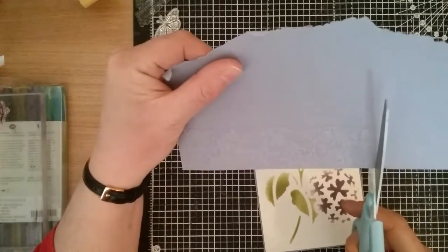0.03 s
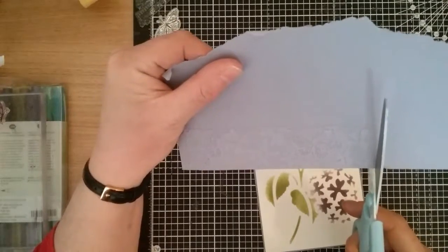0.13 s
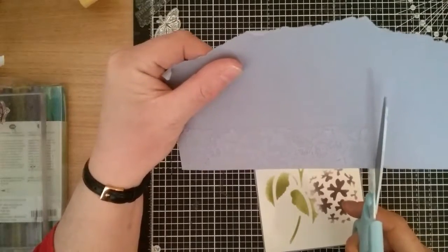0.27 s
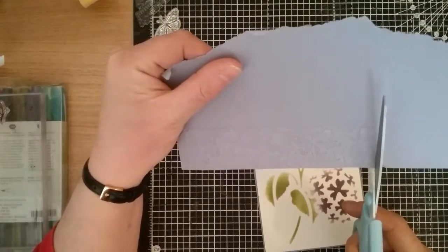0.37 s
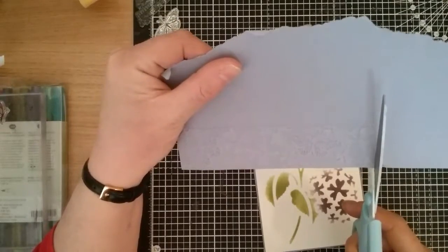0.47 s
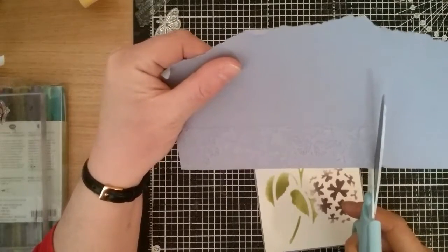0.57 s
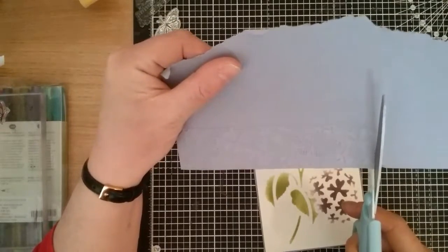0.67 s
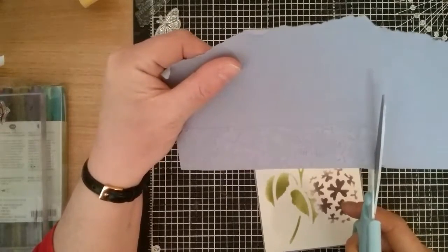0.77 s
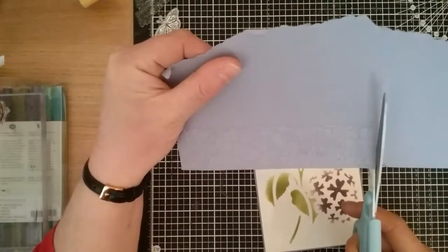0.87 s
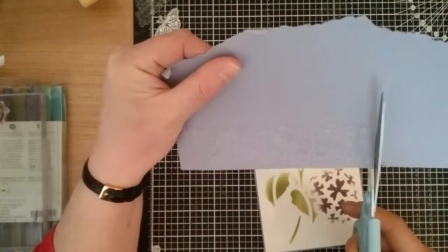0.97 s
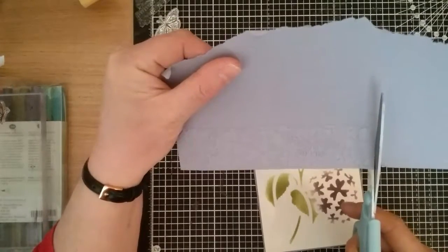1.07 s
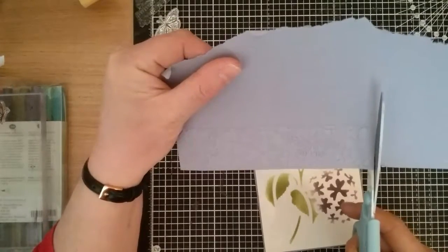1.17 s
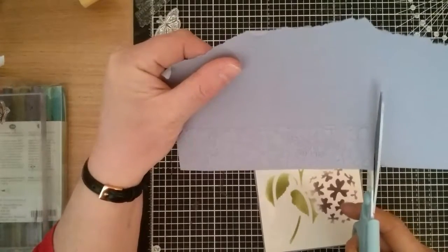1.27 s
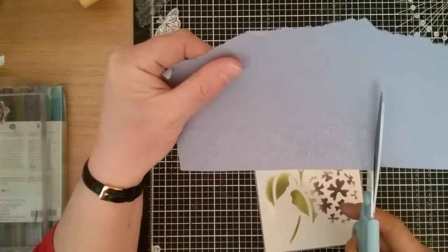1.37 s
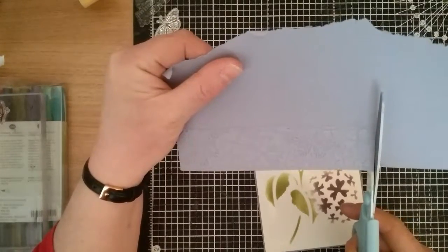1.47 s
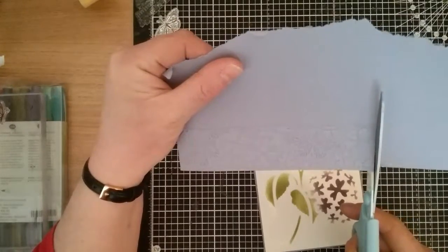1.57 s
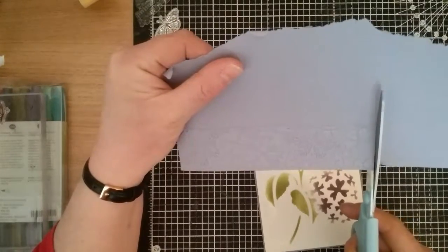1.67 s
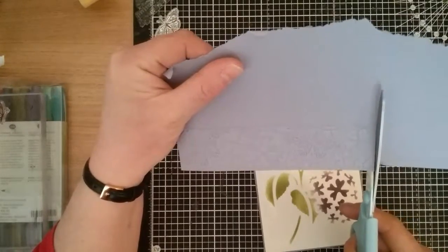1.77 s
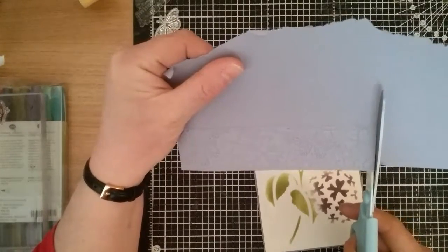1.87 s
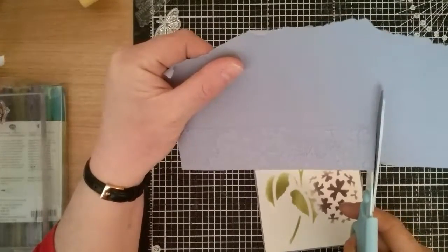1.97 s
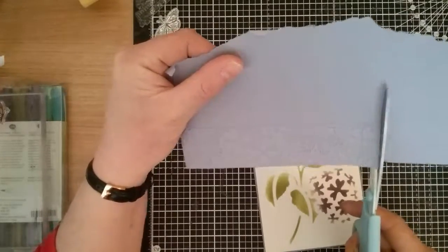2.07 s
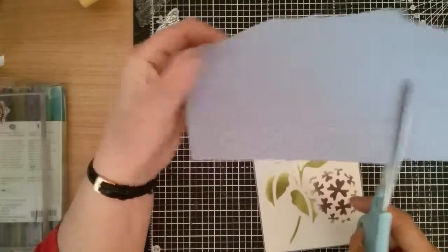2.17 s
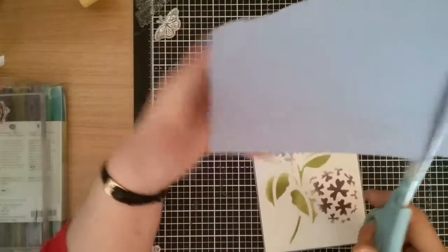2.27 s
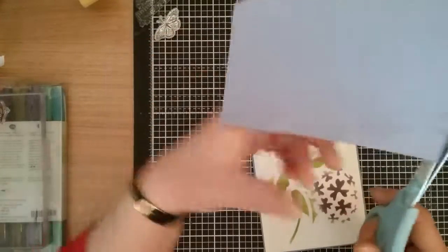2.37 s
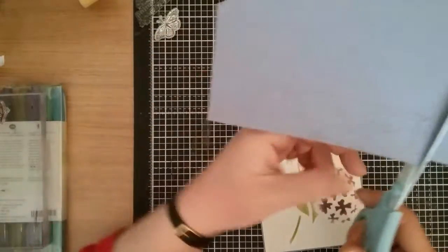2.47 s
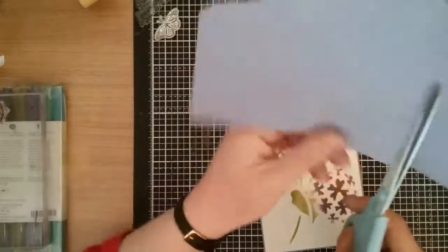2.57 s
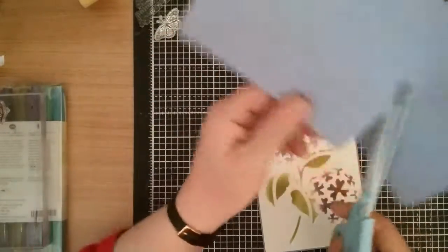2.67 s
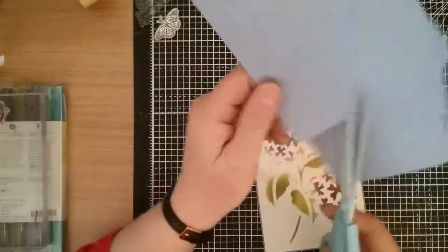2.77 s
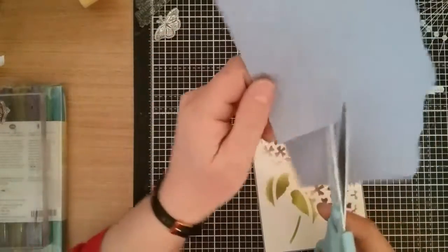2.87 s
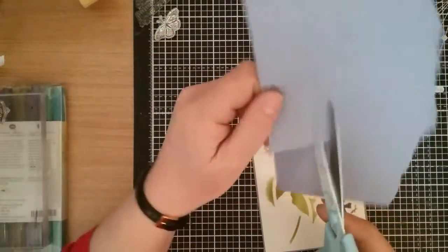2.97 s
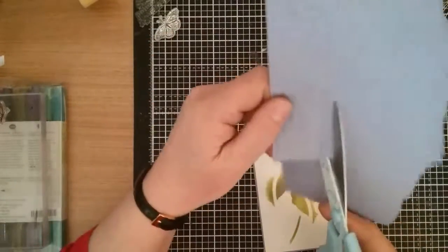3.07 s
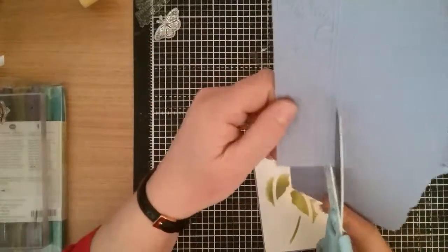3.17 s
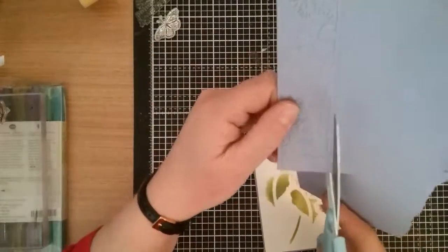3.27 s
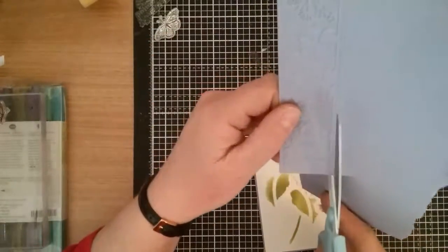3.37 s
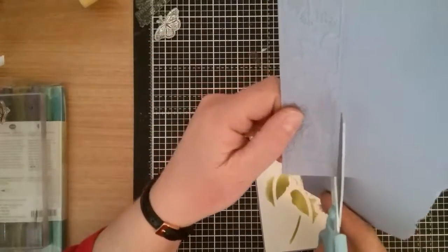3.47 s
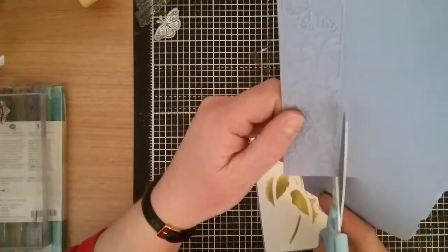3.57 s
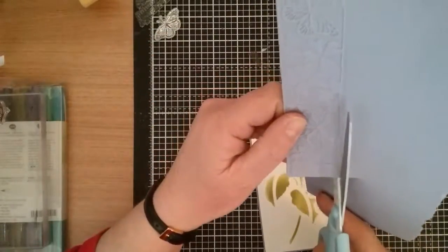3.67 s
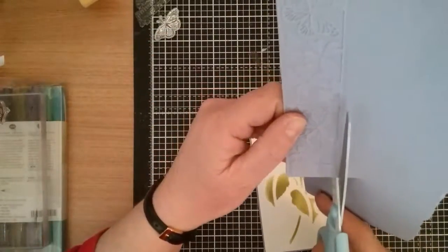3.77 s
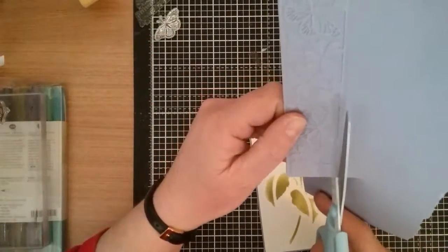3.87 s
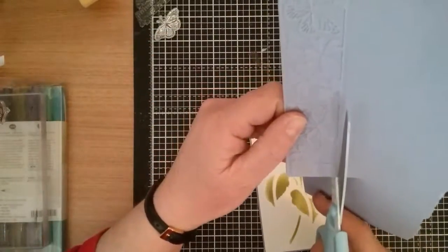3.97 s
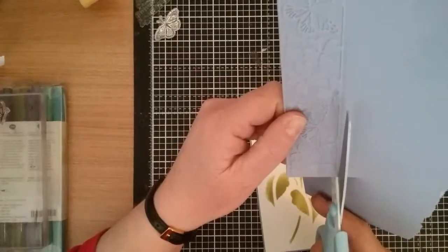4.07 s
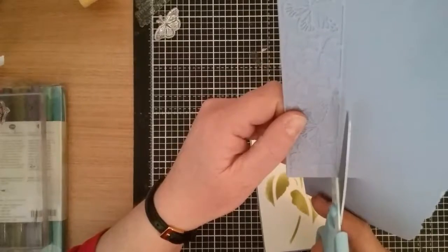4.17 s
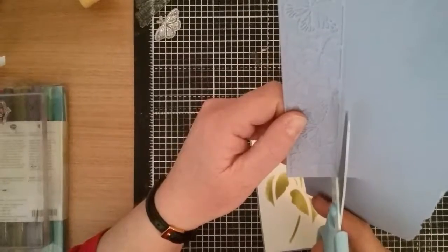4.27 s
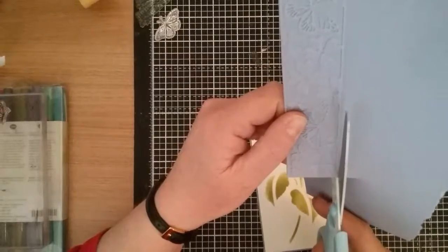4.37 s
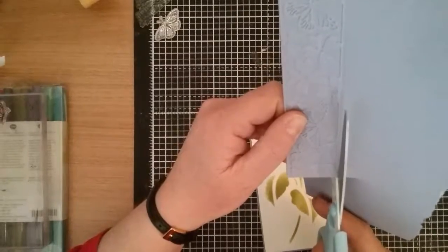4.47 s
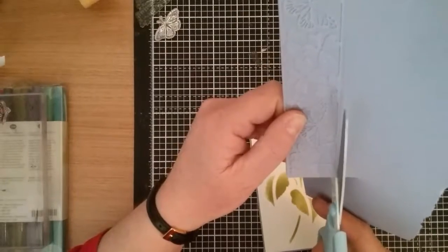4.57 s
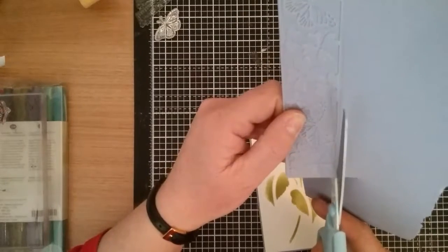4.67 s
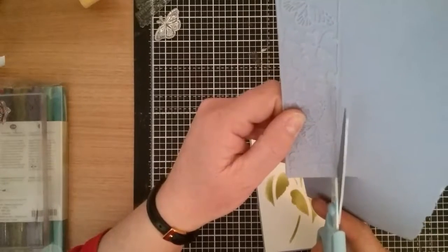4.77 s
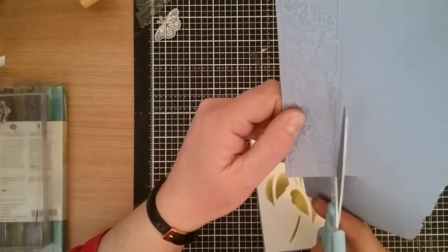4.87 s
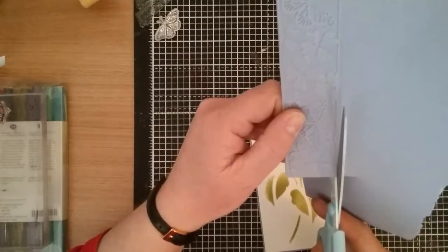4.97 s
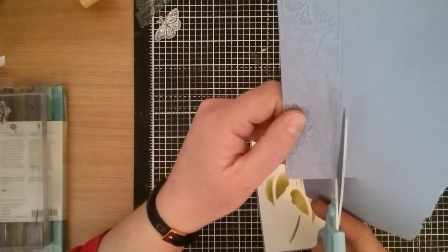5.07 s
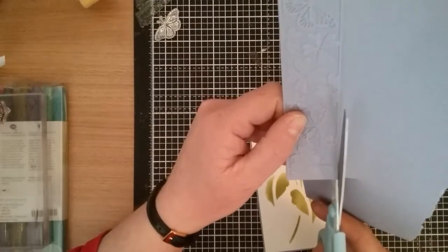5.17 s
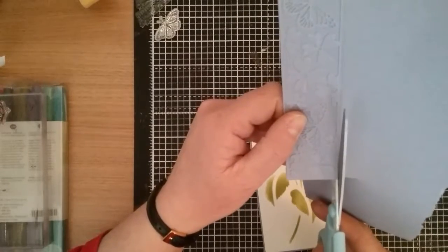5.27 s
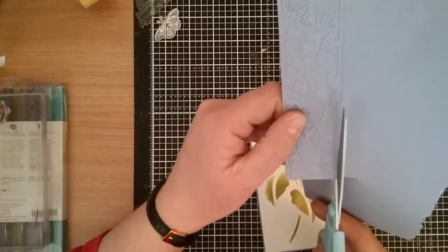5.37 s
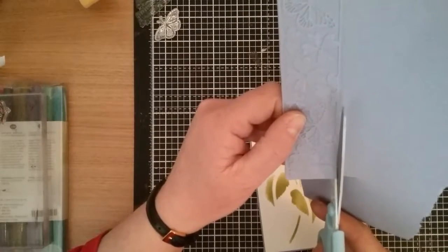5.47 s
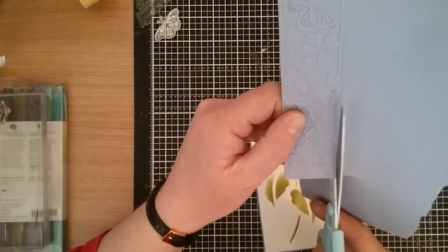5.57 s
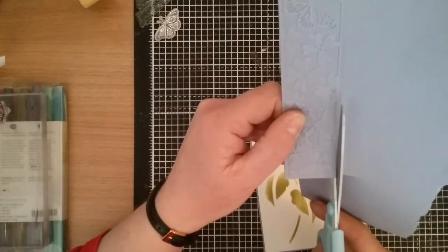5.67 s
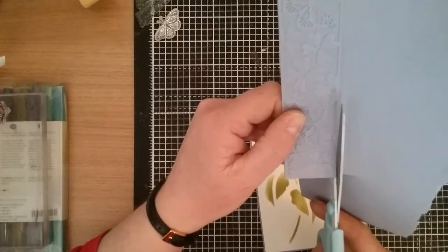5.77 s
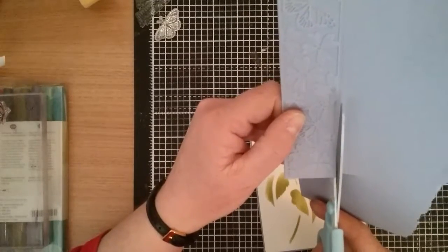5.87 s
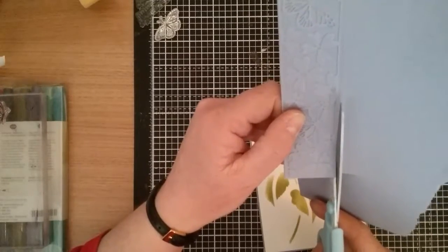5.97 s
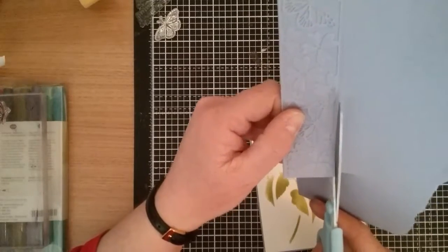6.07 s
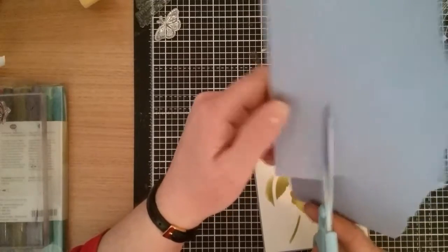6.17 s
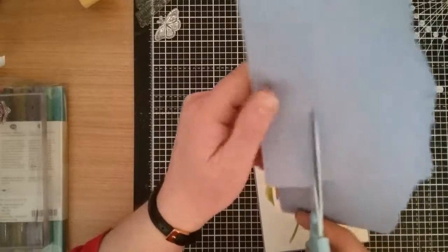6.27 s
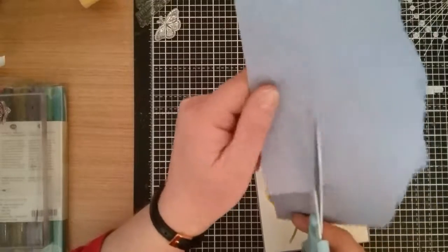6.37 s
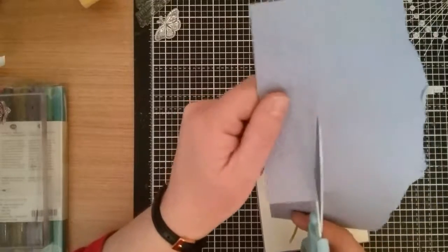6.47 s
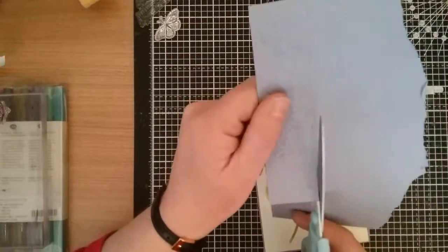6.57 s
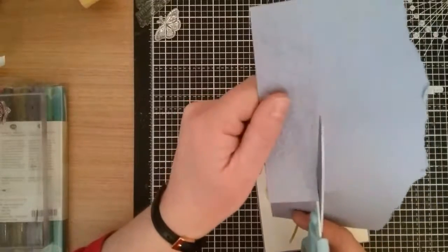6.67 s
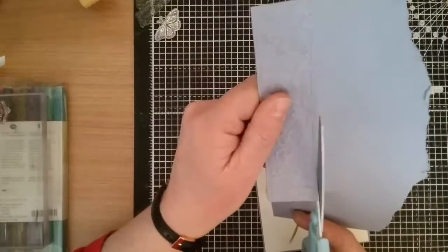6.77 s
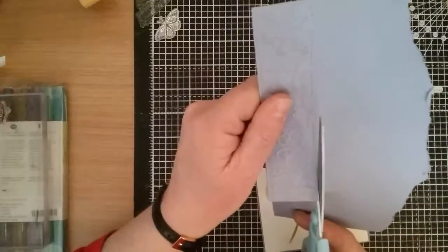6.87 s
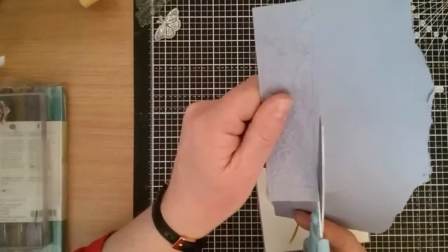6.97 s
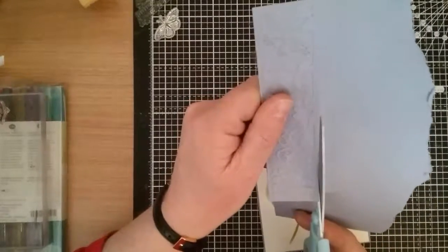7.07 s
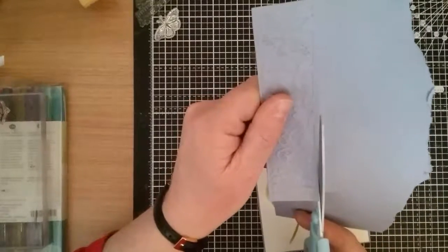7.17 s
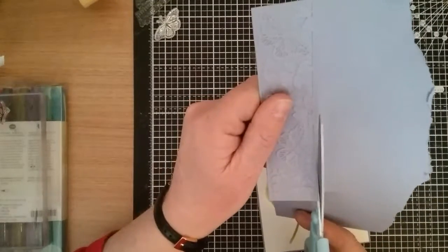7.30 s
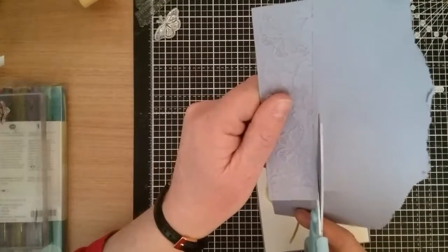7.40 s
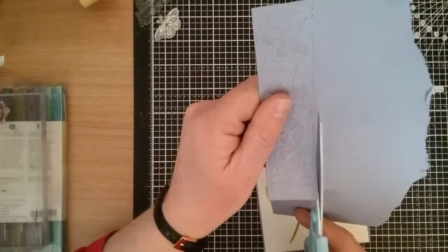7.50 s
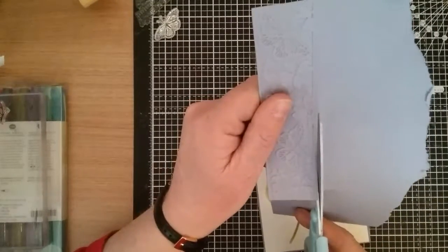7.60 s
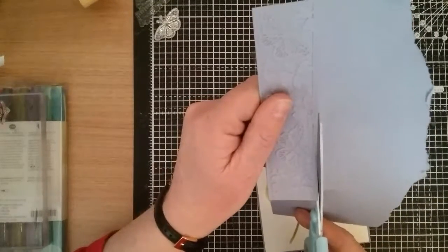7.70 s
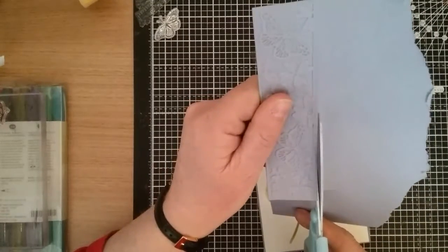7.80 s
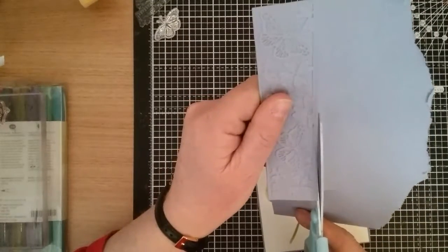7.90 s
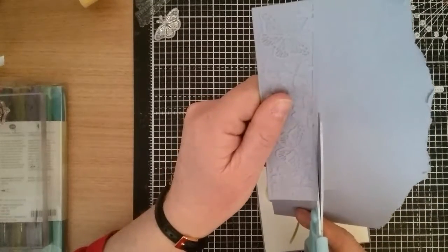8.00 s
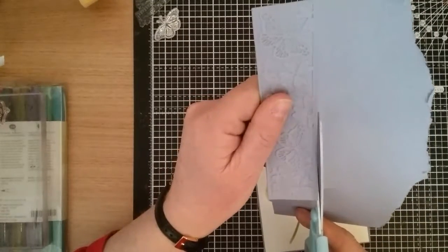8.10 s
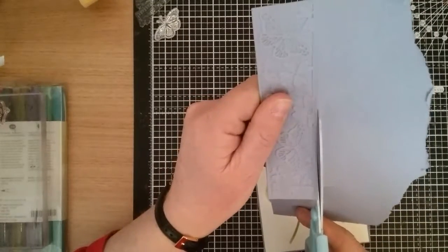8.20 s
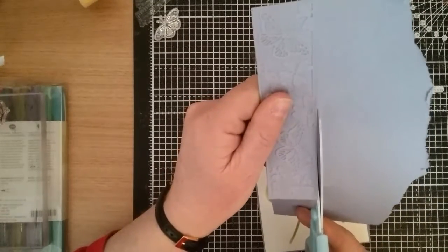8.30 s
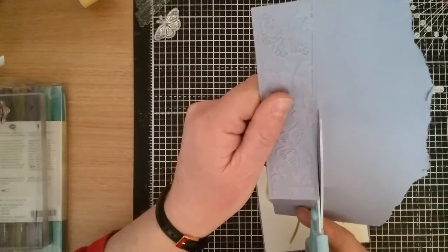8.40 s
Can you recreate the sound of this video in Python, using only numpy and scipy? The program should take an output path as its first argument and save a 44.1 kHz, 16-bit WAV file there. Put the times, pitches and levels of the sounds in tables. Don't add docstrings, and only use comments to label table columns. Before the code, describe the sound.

Scissors cut a stiff sheet of card close to a small microphone. Faint, thin nibbles grow into firmer crunches, then the sheet is turned with flaps, a sharp snap and papery rubbing. After a lull a second cut crackles along, another brief rustle follows, and a third cut begins. A quiet small room adds short reflections, a steady low hum and a faint high whine.

```python
import sys
import numpy as np
from scipy import signal
from scipy.fft import rfft, irfft
from scipy.io import wavfile
from scipy.ndimage import uniform_filter1d

SR = 44100
rng = np.random.default_rng(int(sys.argv[2]) if len(sys.argv) > 2 else 0)


def digitize_waveform(pressure):
    field = np.atleast_2d(pressure).T
    bounded = np.clip(field, -1, 1)
    quanta = np.round(bounded * 32767).astype(np.int16)
    wavfile.write(sys.argv[1], SR, quanta)


def decibels_to_gain(level_db):
    exponent = np.asarray(level_db, float) / 20
    return 10 ** exponent


N = 372204

HUM_HZ = 119.8
# t/s, peak level/dB
SNAP_EVENTS = [
    (2.219, -47),
    (2.5878, -31.5),
    (2.6235, -36),
    (6.228, -33.5),
    (6.236, -46),
    (6.355, -48),
]


def evened(x):
    return x / np.sqrt(np.mean(x ** 2) + 1e-20)


def read(points, hz):
    f, value = np.transpose(points)
    return np.interp(np.log(hz + 1), np.log(f + 1), value)


def add(mix, s, sound):
    part = mix[max(round(s * SR), 0):][:len(sound)]
    part += sound[:len(part)]


def drift(hz):
    return evened(signal.lfilter(*signal.butter(2, hz, fs=SR), rng.standard_normal(N)))


def fibres(count, per_s, spread_db):
    sizes = decibels_to_gain(spread_db * np.minimum(rng.exponential(1, count), 4))
    happens = rng.random(count) < per_s / SR
    return evened(sizes * rng.standard_normal(count) * happens)


def card(bend, tilt=((1, 0), (2, 0)), lift=1, wake_spread_db=5, size=2048):
    # low edge f/Hz, high edge f/Hz
    ranges = [
        (4600, 16000),
        (1100, 4600),
        (420, 1100),
        (150, 420),
    ]
    # f/Hz, width/Hz, level/dB
    sheet_modes = [(214, 115, 5.5), (308, 45, 8), (547, 100, 0), (627, 24, 14.5), (883, 27, 14),
                   (1373, 110, 7.5), (1735, 73, 17), (2324, 170, 10.5), (2870, 200, 7), (3580, 300, 7),
                   (4410, 290, 6.5), (5230, 210, -2), (6070, 200, 0), (6570, 250, -0.5)]
    # f/Hz, level/dB
    slope = [(150, 6), (400, 1.5), (1000, -5), (3000, -9), (4700, -13), (5900, -4.5), (6600, -11),
             (7400, -14.5), (9000, -21.5), (15000, -26)]
    hz = abs(np.fft.fftfreq(size, 1 / SR)) + 1
    shifts = 1 + bend * rng.standard_normal(len(sheet_modes))
    wakes_db = wake_spread_db * rng.standard_normal(len(sheet_modes))
    modes = 0
    for (f, width_hz, db), shift, wake_db in zip(sheet_modes, shifts, wakes_db):
        modes = modes + decibels_to_gain(db + wake_db) * width_hz / np.hypot(width_hz, 2 * (hz - f * shift))
    gain = decibels_to_gain(read(slope, hz / lift) + read(tilt, hz)) * (1 + modes)
    parts = np.array([gain / np.sqrt((1 + (lo / hz) ** 8) * (1 + (hz / hi) ** 8)) for lo, hi in ranges])
    spectrum = np.exp(np.conj(signal.hilbert(np.log(parts + 1e-4))))
    return np.fft.ifft(spectrum).real[:, :size // 2]


def snips():
    # t/s, peak level/dB, sheet ring level/dB
    tip_bites = [(.0288, -61, -12), (.0677, -58, -15), (0.109, -55.5, -11), (.1511, -61, -13),
                 (.186, -55.5, -21), (.2283, -57.5, -10), (.254, -56, -14), (.2894, -60, -7),
                 (.3163, -60, -15), (.3745, -56.5, -8), (.413, -60, -8), (.526, -55.5, -15),
                 (0.6066, -49.5, -13), (0.6564, -53.5, -10), (.6885, -52.5, -8), (.727, -57, -6),
                 (.742, -58, -10), (.805, -56, -12), (.835, -58, -12), (.817, -54, -12), (0.855, -48, -9),
                 (0.888, -49, -7), (.916, -44.5, -8.5), (0.943, -49, -12), (.985, -52, -9),
                 (1.0245, -58, -6)]
    # t/s, peak level/dB, sheet ring level/dB
    first_bites = [(1.1458, -55.5, -7), (1.16, -62, -13), (1.26, -52, -8), (1.1805, -50.5, -5.5),
                   (1.2081, -48, -8), (1.2244, -56, 0), (1.2506, -48, -6), (1.283, -53.5, -4),
                   (1.3788, -48, -5), (1.3984, -53.5, -3), (1.508, -38.5, -8), (1.5535, -47.5, -7),
                   (1.5744, -57, -6), (1.6572, -44, -3.5), (1.6986, -48, -2), (1.7448, -50, -2.5),
                   (1.794, -46.5, -4.5), (1.9047, -56, -1), (1.9183, -46, -3), (2.0442, -50, 1.5),
                   (2.0916, -49.5, 3)]
    # t/s, peak level/dB, sheet ring level/dB
    turn_bites = [(2.1366, -55, -3), (2.3182, -51, -1), (2.5382, -57, -2), (2.9023, -56, 0),
                  (6.3357, -53.5, -2), (6.306, -54, -8), (2.1543, -52, -12), (2.1857, -46, -10),
                  (2.217, -39, 1), (2.249, -56, -6), (2.2755, -47.5, 2.5), (2.3408, -47.5, 2.5),
                  (2.3546, -46, 1), (2.3666, -47.5, 3), (2.394, -42.5, 3), (2.418, -46, -11),
                  (2.5851, -37, -4), (2.6243, -39, 4), (2.642, -36, 0), (2.731, -56, 4), (2.787, -50, -3),
                  (2.7993, -46.5, 0.5), (2.8087, -55, -2), (2.917, -58, -12), (2.985, -57, 2),
                  (3.067, -52, -12), (3.483, -60, -12), (3.5142, -49, -14), (3.8779, -55.5, 1),
                  (3.8887, -52, -17), (6.0926, -52, -19), (6.167, -48, -8), (6.1781, -39, -4),
                  (6.2276, -45, 1), (6.3541, -48.5, 2), (6.461, -43, -2)]
    # t/s, peak level/dB, sheet ring level/dB
    second_bites = [(4.2548, -58, -4), (4.2685, -56, -4), (4.447, -52, -7), (4.485, -58, -12),
                    (4.8977, -56, -8), (4.918, -56, -12), (4.9766, -60, -11), (5.1192, -53, -4),
                    (5.5118, -59, 3), (4.511, -47.5, -6.5), (4.549, -49.5, -8), (4.594, -52, -4.5),
                    (4.651, -50, -6), (4.719, -52, -14), (4.767, -52.5, -3), (4.824, -53, -11),
                    (4.9396, -48.5, -16), (5.08, -54, -12), (5.142, -54, -11), (5.1734, -57, -3),
                    (5.213, -51, -2.5), (5.246, -53, -8), (5.268, -45.5, -4), (5.307, -52, -10),
                    (5.322, -42, -9), (5.392, -49, -5), (5.462, -53, -4), (5.561, -56, 5), (5.68, -57, -8),
                    (5.759, -42.5, -1.5), (5.7835, -45, -2), (5.831, -40.5, -5.5), (5.874, -44.5, -6),
                    (5.932, -49.5, -5), (5.9659, -43, -1)]
    # t/s, peak level/dB, sheet ring level/dB
    third_bites = [(7.195, -57, -4), (7.252, -57, -7), (7.356, -53, -10), (7.408, -61, 0), (7.61, -62, -12),
                   (7.74, -51.5, -6), (7.1573, -59, -11), (7.1753, -54, -6), (7.214, -48, -6),
                   (7.2698, -48, -1.5), (7.3125, -43, -1), (7.339, -47.5, -6.5), (7.3707, -50.5, -8),
                   (7.464, -46, -6.5), (7.5183, -46.5, -6.5), (7.5444, -53, -17), (7.6918, -46.5, -5),
                   (7.7275, -49.5, -3.5), (7.861, -48.5, -4.5), (7.883, -55, -6), (7.9505, -53.5, 0),
                   (8.0411, -41.5, -2.5), (8.0716, -46, -1.5), (8.0808, -42.5, -6.5), (8.2025, -43, -1.5),
                   (8.2367, -51, -2), (8.255, -44, -3.5), (8.317, -45.5, -6)]
    # t/s, flap over ring level/dB
    slack = [(0, -2), (1.0, -7), (1.3, -1.5), (2.45, 1.5), (2.7, -11), (2.8, 7), (4.55, 1.5), (4.7, -4),
             (5.8, -8), (6.2, -11), (6.35, 5), (6.46, -10.5), (7.2, -1.5), (8.44, 0.5)]
    # f/Hz, level/dB
    bite_colour = [(2000, -8), (3600, -7), (4600, -3.5), (5900, 3), (7900, 2.5), (8700, 0), (12000, -2)]
    # f/Hz, level/dB
    deep_colour = [(2500, 1.5), (4300, 1), (5400, -2), (6700, 2.5), (8800, -5)]
    deep_from_s = 7.0
    out, t = np.zeros(N), np.arange(2200) / SR
    for s, peak_db, ring_db in tip_bites + first_bites + turn_bites + second_bites + third_bites:
        fade_s = 0.0059 * decibels_to_gain(0.12 * ring_db)
        flap_db = ring_db + np.interp(s, *np.transpose(slack))
        snapped = any(abs(s - at) < .003 for at, _ in SNAP_EVENTS)
        rise_s = .0005 if snapped else 0.87 * fade_s
        swell = (1 - np.exp(-(t / rise_s) ** 2)) * np.exp(-t / fade_s)
        if s > deep_from_s:
            body = card(0.022, deep_colour, lift=1.08, wake_spread_db=3.5)
        else:
            body = card(0.019, bite_colour, wake_spread_db=3.0)
        burst = fibres(len(t), per_s=12000, spread_db=1.6) * swell
        parts = signal.fftconvolve(burst[None], body[:3], axes=1)
        parts /= np.sqrt(uniform_filter1d(parts ** 2, 200).max(1, keepdims=True))
        start = s + (.001 if snapped else -.003)
        add(out, start, decibels_to_gain(peak_db - 8) * decibels_to_gain([0, ring_db, flap_db]) @ parts)
    return out


def pings():
    # t/s, peak level/dB, f/Hz
    mid_pings = [(0.6091, -54, 1860), (0.9176, -50, 1910), (1.2476, -49, 1790), (1.5094, -41, 4200),
                 (1.5534, -55, 1380), (1.6577, -50, 2840), (1.7001, -50, 1830), (1.7485, -51, 1750),
                 (1.7927, -51, 3140), (1.9186, -49, 2710), (2.0448, -47, 3150), (2.0922, -46, 1750),
                 (2.1366, -47, 1640), (2.22, -39, 1350), (2.3182, -46, 2230), (2.3345, -40, 1750),
                 (2.3646, -37, 1620), (2.398, -33.5, 1360), (2.5382, -50, 1360), (2.5621, -46, 1630),
                 (2.5866, -43, 2860), (2.623, -26, 1480), (2.7926, -43, 1750), (2.9024, -52, 1710),
                 (2.9153, -45, 1710), (3.0643, -39, 1750), (4.5476, -53, 4230), (4.9397, -51, 4050),
                 (5.1737, -55, 1670), (5.2141, -54, 1790), (5.2713, -52, 1770), (5.3214, -51, 4300),
                 (5.5618, -51, 1660), (5.7604, -45, 1730), (5.7837, -51, 1750), (5.8292, -46, 4040),
                 (5.8736, -49, 1750), (5.932, -55, 1740), (5.9675, -50, 1750), (6.1665, -44, 1700),
                 (6.1776, -40, 1670), (6.2275, -41, 1220), (6.3356, -50, 1400), (6.354, -41, 1660),
                 (6.4558, -41, 1730), (7.1742, -47, 3630), (7.2709, -52, 3200), (7.3123, -47, 4400),
                 (7.3393, -50, 4300), (7.464, -56, 1770), (7.5174, -48, 3620), (7.6913, -52, 2440),
                 (7.8626, -55, 1690), (7.9494, -52, 3610), (8.0418, -43.5, 1790), (8.0752, -42, 1760),
                 (8.2063, -40.5, 1720), (8.2377, -46, 1470), (8.2577, -46, 1680), (8.3186, -45, 1670)]
    # t/s, peak level/dB, f/Hz
    low_pings = [(1.382, -48, 536), (1.511, -52, 536), (1.66, -50, 633), (1.748, -49, 579),
                 (1.796, -49, 538), (1.918, -46, 552), (2.048, -52, 447), (2.093, -41, 730),
                 (2.219, -38, 544), (2.285, -42, 624), (2.355, -40, 627), (2.586, -42, 440),
                 (2.624, -39, 633), (2.793, -39, 616), (2.915, -50, 649), (2.978, -43, 571),
                 (4.517, -49, 735), (5.828, -49, 1070), (5.962, -52, 579), (6.227, -46, 877),
                 (6.335, -58, 423), (6.353, -45, 468), (6.423, -47, 579), (7.271, -51, 471),
                 (7.316, -52, 579), (7.467, -52, 575), (7.693, -52, 471), (7.951, -48, 622),
                 (8.04, -53, 471), (8.072, -50, 635), (8.204, -42, 622), (8.319, -46, 627)]
    # t/s, peak level/dB, f/Hz
    high_pings = [(0.6085, -50, 5980), (0.8568, -50, 6160), (0.9845, -47, 5920), (1.1812, -53, 5920),
                  (1.2101, -50, 5980), (1.491, -50, 5900), (1.5072, -37, 5800), (1.5554, -49, 5900),
                  (1.6591, -45, 5980), (1.7459, -49, 5700), (1.7948, -47, 5910), (1.9195, -47, 5880),
                  (2.0453, -51, 6150), (2.0916, -50, 5810), (2.2194, -42, 5860), (2.586, -34, 5800),
                  (2.6244, -37, 6400), (4.5131, -49, 6180), (4.9412, -47, 5850), (5.323, -42, 5960),
                  (5.7593, -43, 5820), (5.7848, -43, 6060), (5.8317, -42, 6000), (5.874, -44, 6050),
                  (5.9329, -47, 6170), (5.9673, -44, 6000), (6.1669, -43, 6100), (6.228, -40, 5460),
                  (7.2709, -48, 6050), (7.3133, -45, 6050), (7.4654, -50, 6160), (7.5188, -48, 5760),
                  (7.6924, -49, 6320), (7.861, -48, 6640), (8.0421, -46, 6630), (8.0716, -44, 6620),
                  (8.208, -39, 6630), (8.2377, -49, 6620), (8.2566, -45, 6400), (8.317, -47, 6630)]
    rise_s, fade_s, trim_db = 0.0028, 0.0049, -6.5
    out, t = np.zeros(N), np.arange(1500) / SR
    swell = (1 - np.exp(-(t / rise_s) ** 2)) * np.exp(-t / fade_s)
    for s, db, hz in mid_pings + low_pings + high_pings:
        width_hz = 136 * (hz / 1750) ** 0.92
        burst = rng.standard_normal(len(t)) * swell
        tone = signal.lfilter(*signal.iirpeak(hz, hz / width_hz, SR), burst)
        add(out, s - .002, decibels_to_gain(db + trim_db) * tone / abs(tone).max())
    return out


def contact():
    # t/s, rub level/dB
    grip = [(0, -80.5), (1.2, -84), (1.7, -74.5), (2.2, -72.5), (2.89, -71), (2.95, -66), (3.7, -69),
            (3.85, -80), (4.05, -71.5), (4.2, -77.5), (5.15, -73.5), (5.64, -77.5), (5.85, -69.5),
            (6.04, -75), (6.7, -81), (7.3, -76.5), (7.7, -78), (8.44, -78.5)]
    # t/s, length/s, edge hiss level/dB, ring/dB, flap/dB
    turns = [(2.138, 0.052, -54, -4, -9), (2.246, 0.073, -59.5, 1.5, 5.5), (2.334, 0.095, -59.5, 1, 8),
             (2.556, 0.04, -64.5, -1, 5.5), (2.632, 0.04, -47.5, 2.5, 1), (2.68, 0.135, -57.5, 2.5, 0),
             (2.926, 0.06, -57, 2.5, 3), (3.0, 0.036, -57.5, 2.5, 7), (3.054, 0.16, -56, 1.5, 4),
             (3.212, 0.26, -67.5, 2.5, 4.5), (3.459, 0.13, -60, -1, -0.5), (3.682, 0.037, -62, -1, 2.5),
             (3.897, 0.071, -58, -5.5, -8), (4.256, 0.1, -58.5, -4, -7.5), (6.1, 0.056, -62.5, 1.5, -6),
             (6.156, 0.033, -57, -1, -2.5), (6.246, 0.056, -64.5, 0, -10), (6.38, 0.077, -65, 1.5, 5),
             (6.45, 0.083, -55, -0.5, 0.5), (6.613, 0.025, -67, -6, -8), (6.809, 0.073, -68, 2.5, 2.5)]
    # t/s, length/s, edge hiss level/dB, ring/dB, flap/dB
    creeps = [(0.908, .04, -66.5, -3, 0), (1.357, .03, -70.5, 1, -8), (1.92, 0.046, -67.5, 2, 0),
              (4.431, 0.023, -66, -5, 4), (4.633, 0.087, -63, -3.5, -6), (4.755, 0.064, -65.5, -7, -1.5),
              (4.883, 0.043, -68.5, -9, 0), (4.97, 0.08, -61, -2, -6), (5.34, 0.08, -58.5, -2.5, -4),
              (5.546, 0.038, -68, -2, 3), (5.7, 0.07, -65, -1.5, -12), (7.147, 0.092, -64.5, -3.5, -4),
              (7.28, .06, -78, -7, 8), (7.506, 0.061, -66.5, 1, -4), (8.27, 0.097, -68, -4, 0)]
    attack_db_per_s, release_db_per_s = 548, 480
    t = np.arange(0, N / SR + .002, .002)
    grip_balance = decibels_to_gain([[0], [-0.5], [2.5]])
    power = (decibels_to_gain(np.interp(t, *np.transpose(grip))) * grip_balance) ** 2
    for start, length, db, ring_db, flap_db in turns + creeps:
        shape_db = -attack_db_per_s * np.maximum(start - t, 0)
        shape_db -= release_db_per_s * np.maximum(t - start - length, 0)
        shape_db -= 2.5 * np.clip(2 * (t - start) / length - 1, -1, 1) ** 2
        power += (decibels_to_gain(db + shape_db) * decibels_to_gain([[0], [ring_db], [flap_db]])) ** 2
    hiss, ring, flap = (np.interp(np.arange(N) / SR, t, gain) for gain in np.sqrt(power))
    return hiss, ring, flap * decibels_to_gain(-2.0), flap * decibels_to_gain(-7.5)


def slide():
    rub = fibres(N, per_s=12000, spread_db=1.7) * decibels_to_gain(1.7 * drift(55))
    shares = decibels_to_gain(6 * np.array([drift(4) for shape in range(3)]))
    shares /= np.sqrt((shares ** 2).sum(0))
    bands = 0
    for share, lift in zip(shares, (.96, 1.01, 1.08)):
        body = card(.007, lift=lift, wake_spread_db=3)
        bands = bands + share * signal.oaconvolve(rub[None], body, axes=1)[:, :N]
    return sum(gain * evened(band) for gain, band in zip(contact(), bands))


def sings():
    # t/s, length/s, f/Hz, width/Hz, level/dB
    rubbed_modes = [(2.75, 0.056, 1290, 78, -53.5), (2.785, 0.034, 1700, 110, -52.5),
                    (2.786, 0.067, 640, 95, -52), (2.79, 0.024, 4450, 250, -54.5),
                    (3.27, .22, 4400, 170, -71), (3.59, .07, 4400, 190, -70), (3.03, .17, 5350, 250, -63),
                    (3.48, 0.11, 5500, 250, -66), (2.92, .2, 2400, 110, -66),
                    (6.45, .035, 1690, 120, -52.5), (6.16, .035, 6050, 270, -56),
                    (6.46, .09, 4550, 200, -61), (2.93, .2, 200, 140, -59.5), (3.646, 0.084, 1070, 49, -67),
                    (6.157, 0.032, 1670, 170, -54), (6.358, 0.068, 1710, 120, -72),
                    (6.539, 0.046, 140, 18, -54), (3.28, .45, 700, 27, -76), (6.46, 0.1, 3300, 660, -61.5),
                    (3.0, .2, 1620, 150, -56.5), (2.35, 0.037, 1420, 240, -50), (3.07, .09, 6650, 500, -60),
                    (2.14, .056, 6900, 800, -60), (3.9, .06, 2700, 900, -64), (3.2, .1, 720, 90, -64)]
    out = np.zeros(N)
    for s, length, hz, width_hz, db in rubbed_modes:
        noise, count = rng.standard_normal(SR // 2), round(length * SR)
        tone = signal.lfilter(*signal.iirpeak(hz, hz / width_hz, SR), noise)[-count:]
        add(out, s, decibels_to_gain(db) * evened(tone) * signal.windows.tukey(count, .5))
    return out


def knocks():
    # t/s, level/dB, f/Hz
    taps = [(1.402, -54, 230), (1.659, -47, 260), (1.747, -51, 265), (1.921, -49.5, 250),
            (2.051, -49.5, 250), (2.093, -50, 246), (2.62, -45, 200), (3.699, -56.5, 220),
            (6.358, -51.5, 220), (1.551, -53.5, 266), (8.046, -57, 282), (8.263, -53, 298),
            (7.467, -55.5, 596), (7.482, -60, 608), (7.74, -57, 594), (8.32, -57, 870), (4.595, -58.5, 470),
            (4.05, -61, 440), (.918, -61, 610), (1.25, -62, 580)]
    # t/s, level/dB, f/Hz
    slaps = [
        (2.5877, -30, 285),
    ]
    out, t = np.zeros(N), np.arange(4000) / SR
    balance = decibels_to_gain([3.5, 1.0, 3.5, -3])
    snap = balance @ card(0, wake_spread_db=2) * np.exp(-t[:1024] / 0.0045)
    for s, db in SNAP_EVENTS:
        add(out, s, -decibels_to_gain(db) * snap / abs(snap).max())
    for blows, fade_s in ((taps, 0.0079), (slaps, 0.0043)):
        swell = (1 - np.exp(-t / 0.00093)) * np.exp(-t / fade_s)
        for s, db, hz in blows:
            add(out, s, -decibels_to_gain(db) * swell * np.sin(2 * np.pi * hz * t) * 1.98)
    return signal.lfilter(*signal.butter(2, 169, "high", fs=SR), out)


def room(x):
    # f/Hz, t60/s
    decay = [(200, 0.15), (700, 0.15), (2000, 0.12), (6000, 0.11)]
    echoes = np.zeros(SR // 2)
    at = np.arange(200, len(echoes) - 20, 20)
    echoes[at + rng.integers(0, 20, len(at))] = rng.choice([-1., 1.], len(at))
    hz, t, z = signal.stft(echoes, SR, nperseg=256)
    fading = decibels_to_gain(-60 * t / read(decay, hz)[:, None])
    tail = signal.istft(z * fading, SR, nperseg=256)[1]
    return signal.oaconvolve(x, tail / np.linalg.norm(tail))[:N]


def mains_hum():
    t = np.arange(N) / SR
    return decibels_to_gain(-49) * np.sqrt(2) * np.sin(2 * np.pi * HUM_HZ * t)


def fan():
    fan_hz, width_hz = 143.6, 1.55
    phase = 2 * np.pi * fan_hz * np.arange(N) / SR
    return decibels_to_gain(-71.5) * (drift(width_hz) * np.cos(phase) + drift(width_hz) * np.sin(phase))


def whine():
    # multiple of the hum, depth level/dB
    ripples = [
        (2, -30),
        (4, -38),
    ]
    t = np.arange(N) / SR
    turns = np.cumsum(13222 + 0.63 * drift(2.9) + 2.6 * drift(120)) / SR
    ripple = 1 + sum(decibels_to_gain(db) * np.cos(2 * np.pi * round(k) * HUM_HZ * t) for k, db in ripples)
    level = decibels_to_gain(-53 + .15 * drift(12))
    return level * np.sqrt(2) * ripple * np.sin(2 * np.pi * turns)


def air():
    # f/Hz, level/dB
    colour = [(10, -31), (60, -2), (100, 4.5), (170, 2.5), (260, -3), (600, -10), (1500, -14.5),
              (3700, -19.5), (4800, -21), (6000, -19), (7200, -19.5), (8500, -23.5), (15000, -18.5)]
    z = rfft(rng.standard_normal(N)) * decibels_to_gain(read(colour, np.fft.rfftfreq(N, 1 / SR)))
    return decibels_to_gain(-65) * evened(irfft(z, N))


def scene():
    cutting = snips() + pings() + slide() + sings()
    blows = knocks()
    echoes = decibels_to_gain(-8.2) * room(cutting + decibels_to_gain(-3) * blows)
    background = mains_hum() + fan() + whine() + air()
    return (cutting + blows + echoes + background)[None]


def band_limit(x):
    return signal.sosfilt(signal.butter(12, 15160, fs=SR, output="sos"), x)


def record(dry):
    mix = dry - .0006
    return band_limit(mix)


dry = scene()
out = record(dry)
digitize_waveform(out)
```